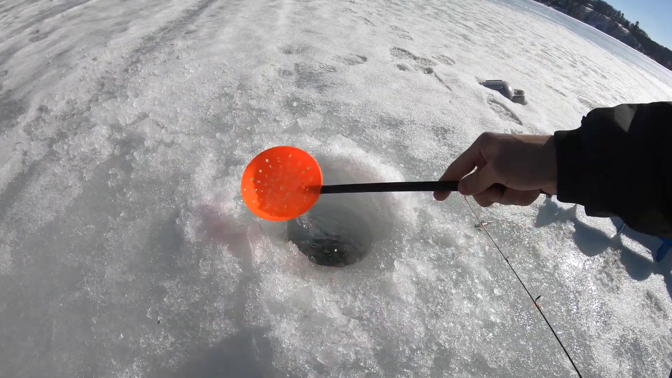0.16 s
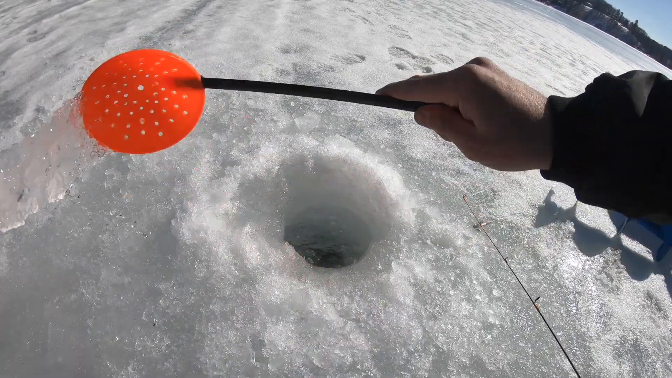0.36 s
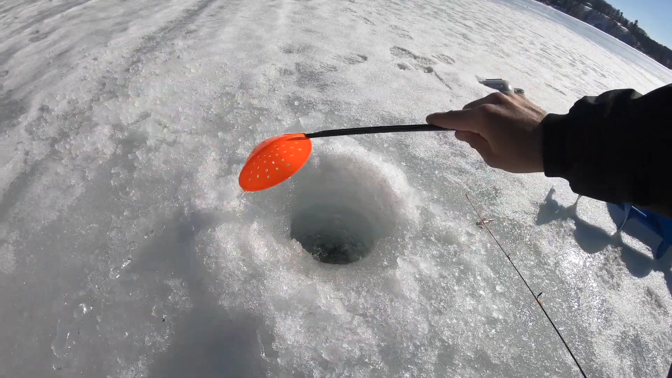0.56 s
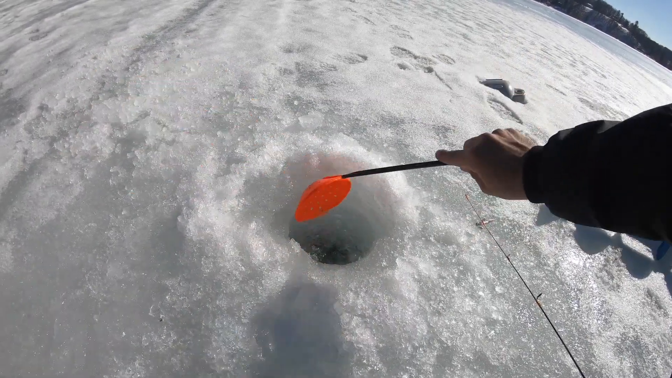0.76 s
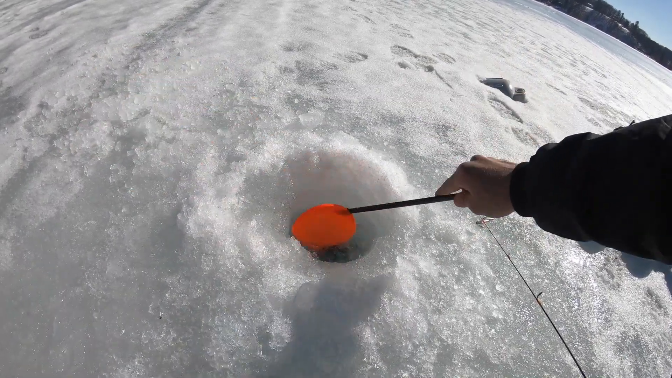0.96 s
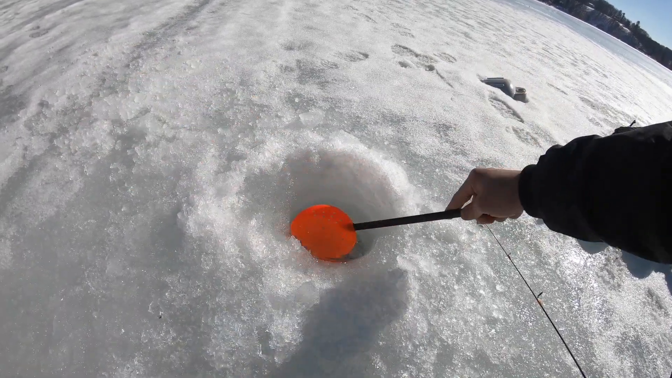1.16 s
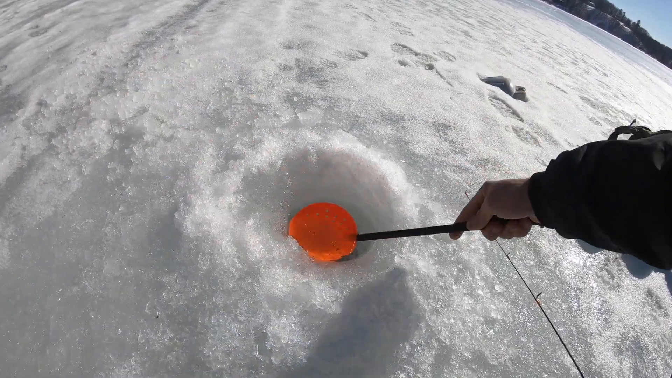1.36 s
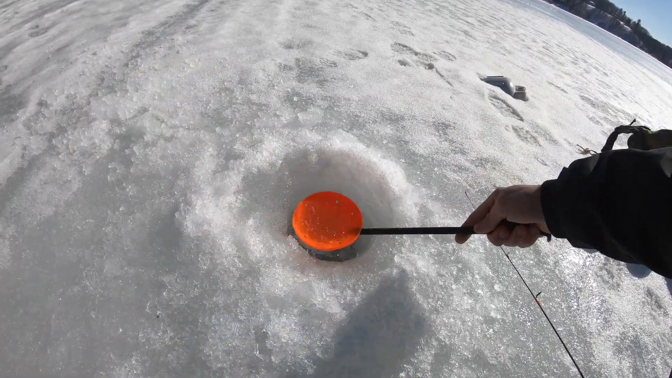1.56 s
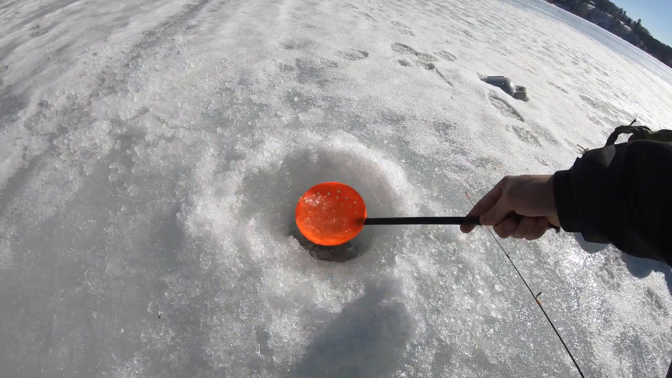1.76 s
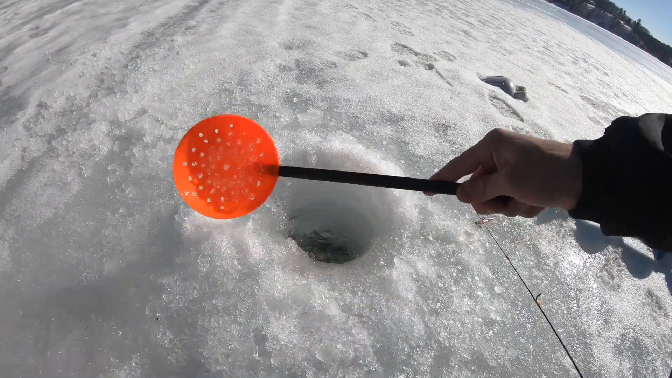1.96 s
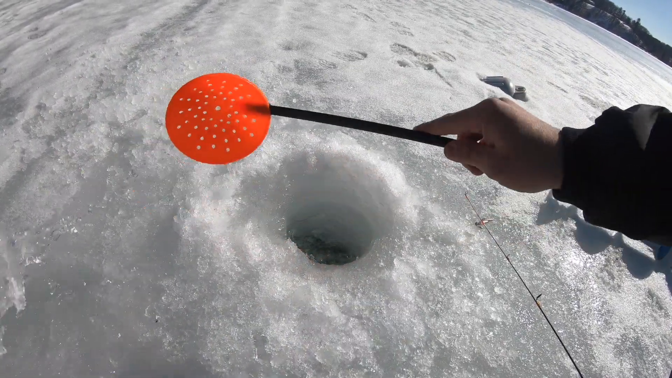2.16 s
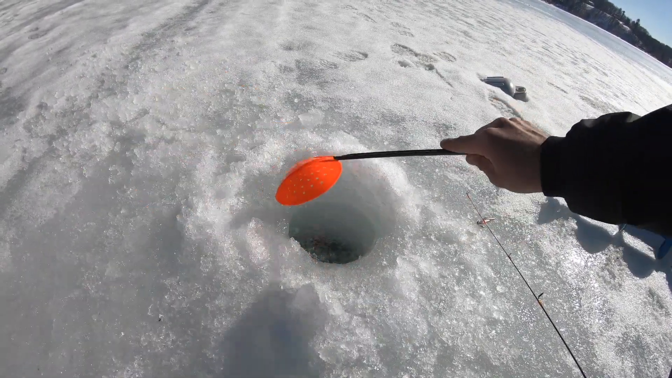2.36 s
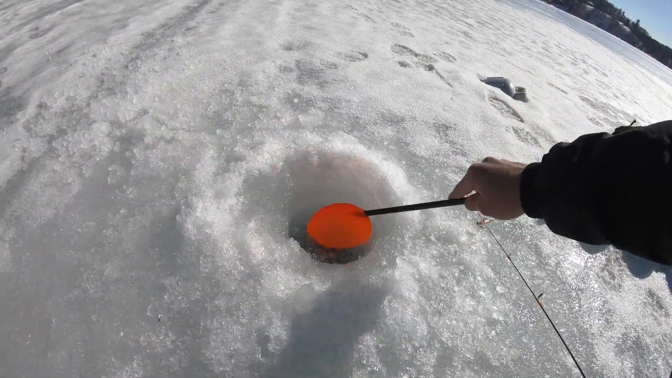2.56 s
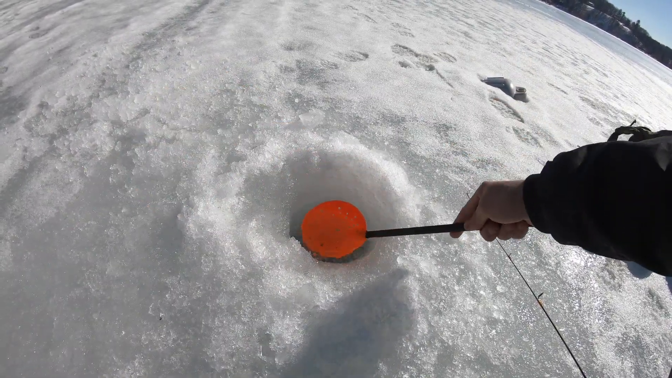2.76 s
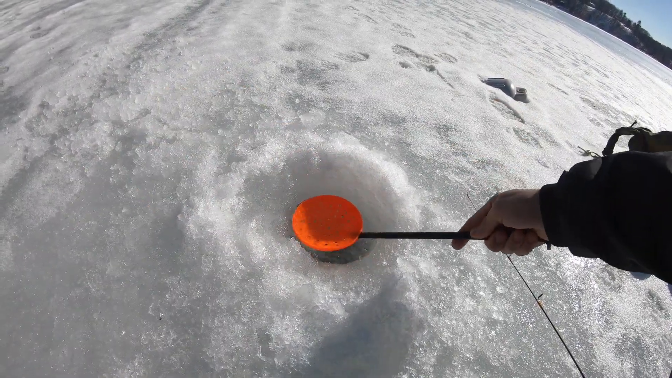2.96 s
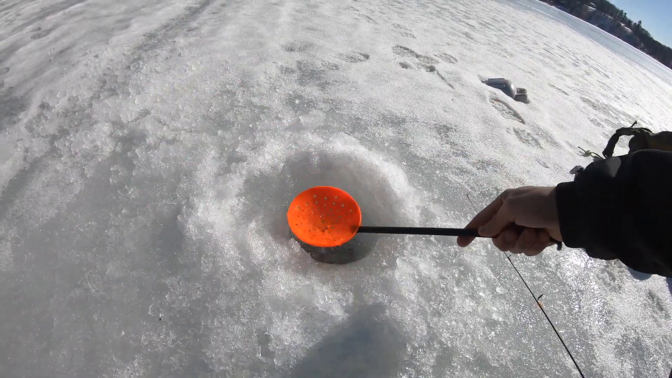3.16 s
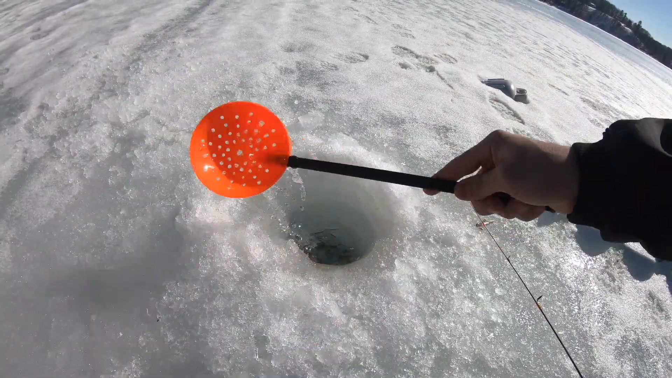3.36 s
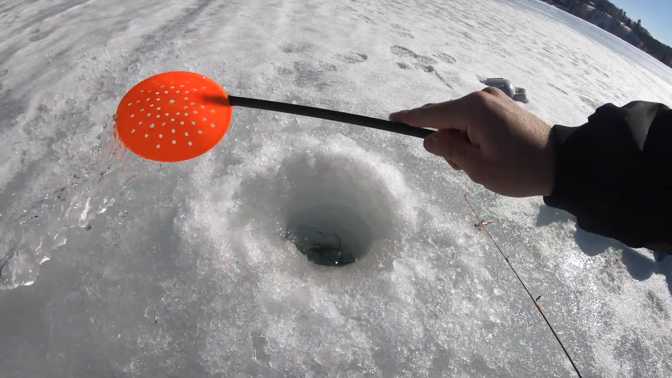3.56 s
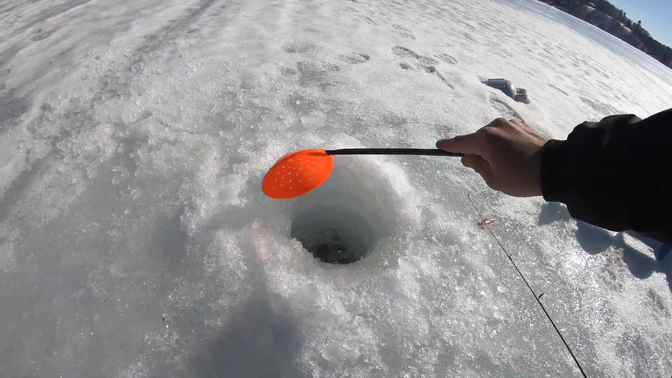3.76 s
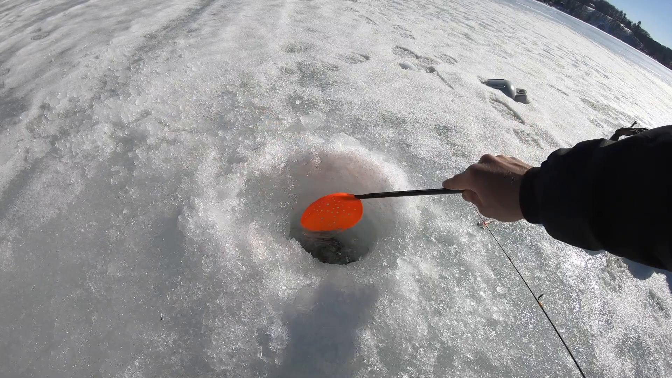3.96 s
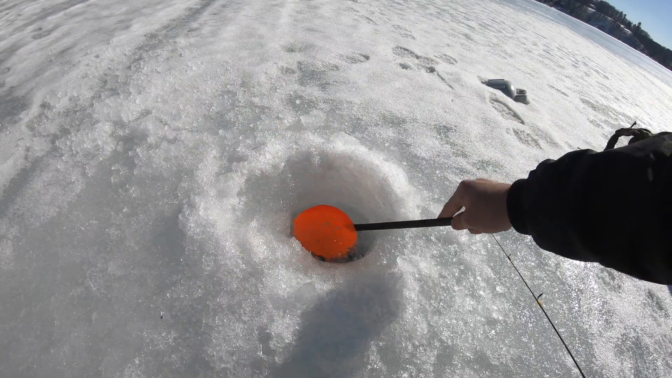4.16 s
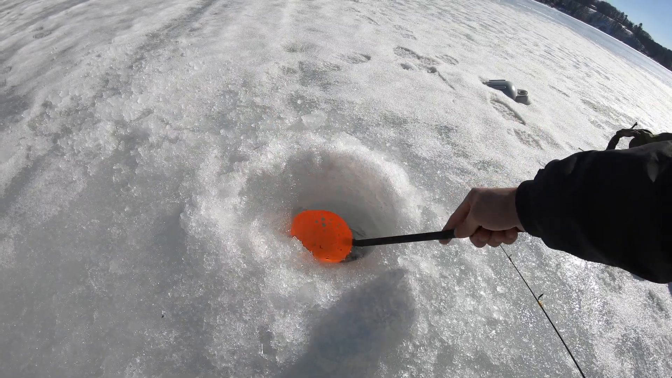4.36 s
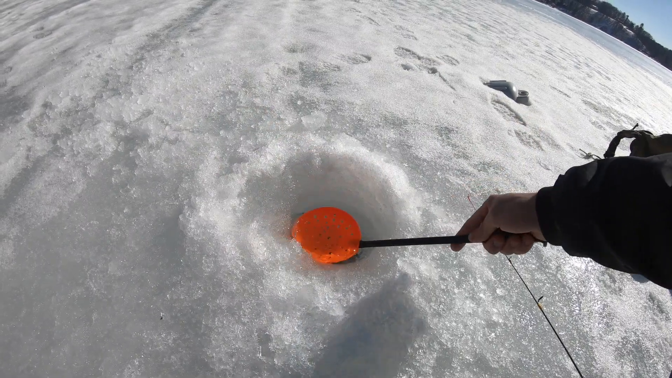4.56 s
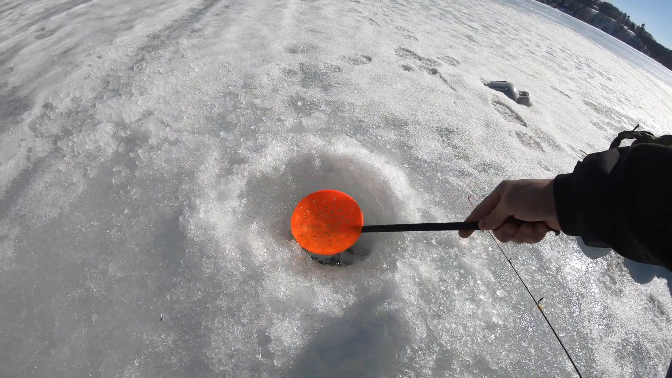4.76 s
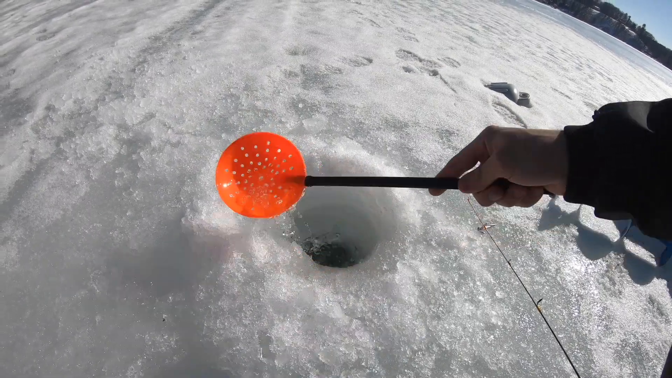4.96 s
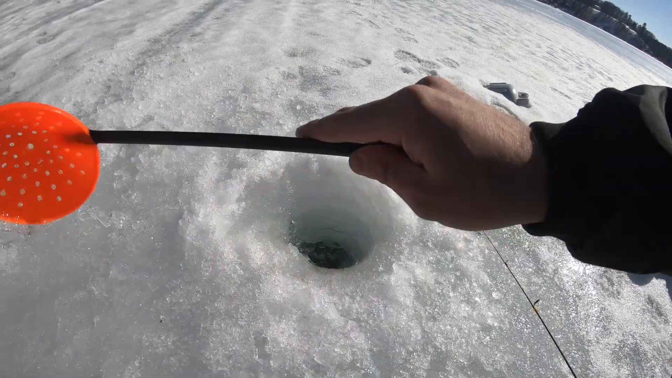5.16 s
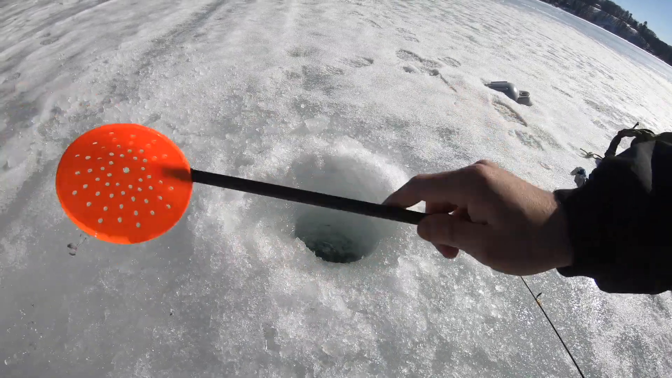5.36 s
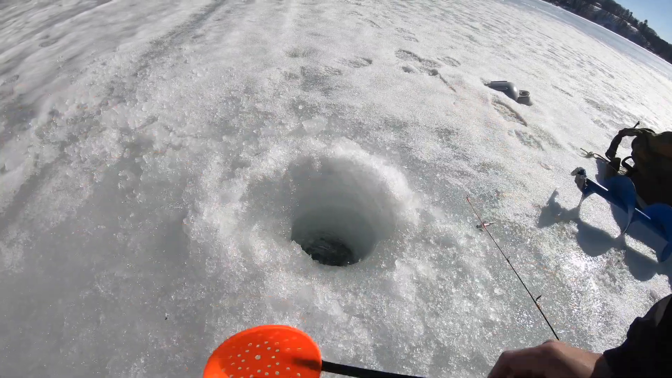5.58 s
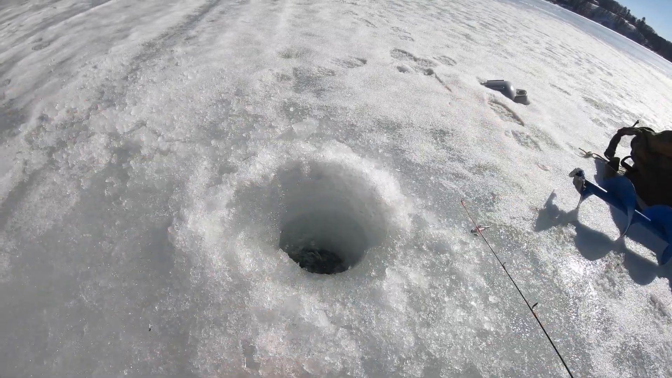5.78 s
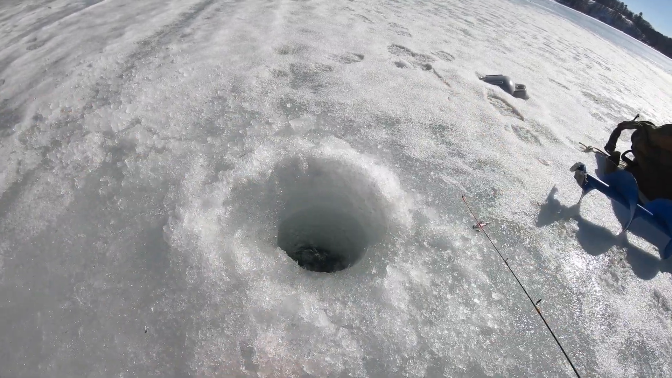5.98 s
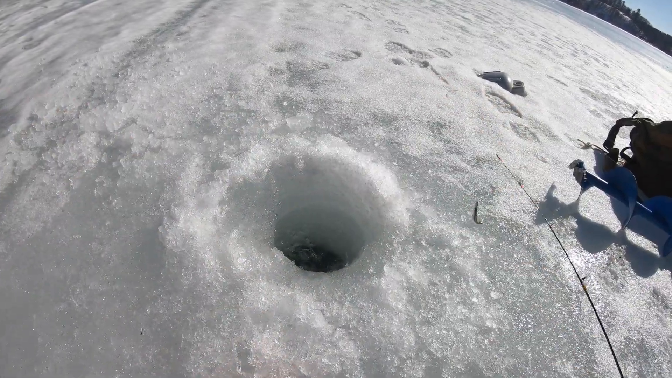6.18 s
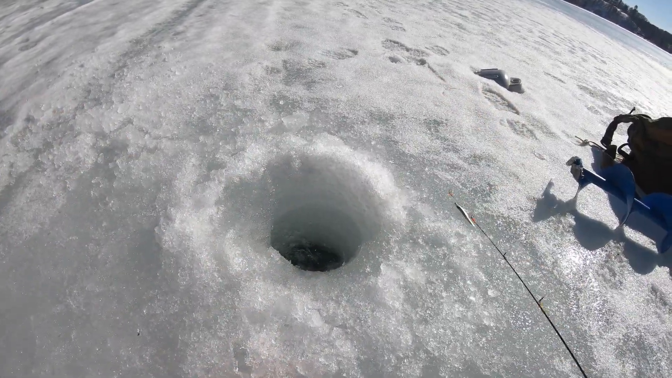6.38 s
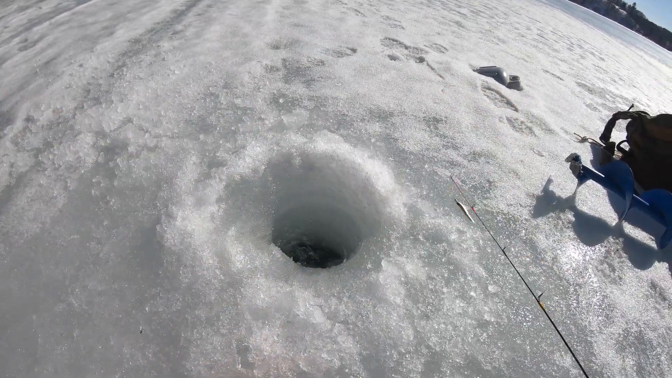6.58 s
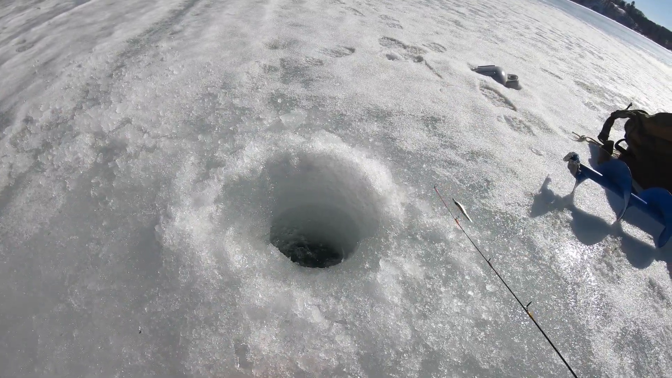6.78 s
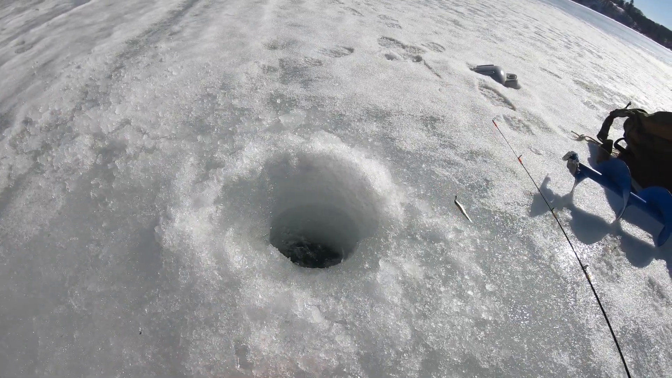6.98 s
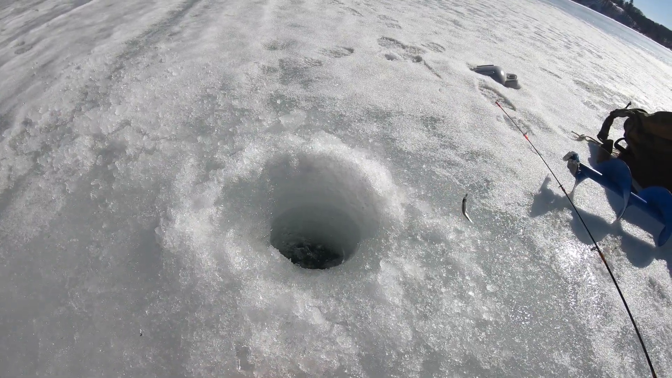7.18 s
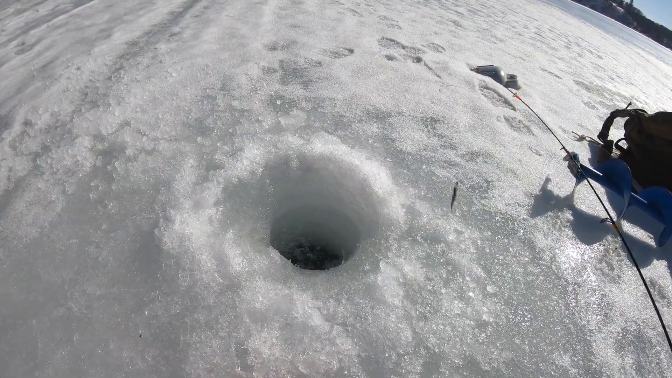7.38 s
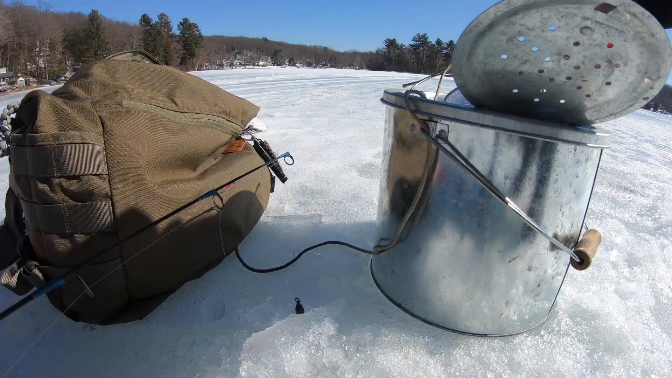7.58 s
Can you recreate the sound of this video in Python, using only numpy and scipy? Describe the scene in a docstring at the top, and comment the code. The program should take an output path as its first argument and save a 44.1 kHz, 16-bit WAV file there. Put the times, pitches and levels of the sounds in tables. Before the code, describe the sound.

A plastic ladle scoops slush from a hole in a frozen lake, close by, while wind rumbles and flutters on the microphone over a faint, distant rush of air. A wet slosh at 0.4 seconds and a fizzing splat at 0.7 come with a strong, wide gust; after one second the sound narrows to the centre. Light clicks on ice and small sloshes follow, with a very faint, thin squeak at 1.6. A knock and loud slosh at 2.1 lead to icy splatter and a cluster of clicks around 2.5. Slush drains and lands again at 3.8, followed by more taps. The busiest stretch, from 5 to 6 seconds, brings sloshes, crackling splats and a sharp knock near 5.9. Occasional tiny bubbles pop, and low wind puffs thump through the scooping. Then the draining thins to soft drips and ticks under the wind until about 7.5 seconds.

```python
"""Skimming slush from an ice hole

A plastic ladle scoops slush from a hole in lake ice. The slush hisses and crackles as it slides, drains
and is thrown; knocks on ice chips and the rim excite the ladle's damped modes; bubbles pop, and there is
one thin squeak. Turbulent wind buffets the microphone over a far rush of air. The stereo image is wide
in the first gust, then narrows to the centre."""
import sys
import numpy as np
from scipy import signal
from scipy.fft import rfft, irfft, next_fast_len
from scipy.io import wavfile
from scipy.ndimage import map_coordinates

SR = 44100
rng = np.random.default_rng(int(sys.argv[2]) if len(sys.argv) > 2 else 0)


def persist_wave(psi):
    """Save psi, clipped to +-1, as 16-bit WAV."""
    counts = np.round(np.clip(psi, -1, 1) * 32767).astype(np.int16)
    wavfile.write(sys.argv[1], SR, np.atleast_2d(counts).T)


N = 336471


def amp(db):
    return 10 ** (np.asarray(db) / 20)


def unit_rms(x):
    return x / np.sqrt(np.mean(x ** 2) + 1e-20)


def curves(rows):
    """Linear interpolation: one value per sample for each column after the time."""
    time_s, *columns = np.transpose(list(rows))
    return [np.interp(np.arange(N) / SR, time_s, column) for column in columns]


def wobble(rate_hz):
    """Random modulation: a spline through Gaussian values, rate_hz of them a second."""
    knots = rng.standard_normal(int(N * rate_hz / SR) + 4)
    return map_coordinates(knots, [np.arange(N) * rate_hz / SR])


def filtered(x, response):
    """Zero-phase filtering: the spectrum of x times a function of frequency."""
    size = next_fast_len(N + 8192)
    return irfft(rfft(x, size) * response(np.fft.rfftfreq(size, 1 / SR)), size)[..., :N]


def equalised(x, points):
    """Spectral shaping by (frequency_hz, gain_db) points joined on a log-frequency axis."""
    frequency_hz, gain_db = np.transpose(points)
    return filtered(x, lambda hz: amp(np.interp(np.log(hz + 1), np.log(frequency_hz), gain_db)))


def coloured(x, points):
    """Band-pass shaping: the spectrum falls away beyond the points; rms 1."""
    return unit_rms(equalised(x, [(1, -120), *points, (SR / 2, -120)]))


def grains(per_s, pitch_hz, spread, decay_cycles, size_db, rise=0):
    """Shot noise: tiny damped sines at random moments, a few much larger than the rest; rms 1."""
    when, rank = rng.random((int(per_s * N / SR), 2)).T[:, :, None]
    hz = np.clip(pitch_hz * np.exp(spread * rng.standard_normal(when.shape)), 600, SR / 4)
    k = np.arange(384)
    age = k * hz / (decay_cycles * SR)  # in time constants
    attack = np.minimum(4 * age, 1) if rise else 1
    shape = np.sin(2 * np.pi * hz * k / SR * (1 + rise * age)) * np.exp(-age) * attack
    size = amp(-size_db * np.log(rank + 0.039))
    at = (when * N).astype(int) + k
    return unit_rms(np.bincount(at.ravel(), (size * shape).ravel(), N + 384)[:N])


def bursts(rows, rise_s):
    """Exponential growth and decay of wet and icy power: 12 dB up in rise_s(fade_s), down in fade_s."""
    t, power = np.arange(N) / SR, np.zeros((2, N))
    for peak_s, wet_db, icy_db, fade_s in rows:
        span = slice(max(round((peak_s - .6) * SR), 0), round((peak_s + .8) * SR))
        age = t[span] - peak_s
        down_db = 12 * np.where(age < 0, -age / rise_s(fade_s), age / fade_s)
        power[:, span] += amp(2 * (np.array([[wet_db], [icy_db]]) - down_db))
    return power


def wind():
    """Turbulent pressure on a microphone port: a deep buffet, flutter in its cavity and single puffs."""
    # strength of the gusts: time_s, buffet_db, flutter_db
    gusts = [(0, -40, -50.5), (.3, -37, -47), (.45, -26.5, -42), (.82, -24, -40), (1.04, -46.5, -53.5),
             (1.6, -41, -40), (1.9, -45.5, -42.5), (2.5, -36, -40.5), (3.2, -46, -43.5), (3.58, -35, -38),
             (4.1, -37, -38.5), (4.65, -47.5, -44), (5.1, -31.5, -40), (5.78, -29.5, -31),
             (5.9, -43.5, -60), (6.42, -52.5, -46.5), (7.05, -37.5, -48.5), (7.56, -40, -47)]
    # buffet spectrum: frequency_hz, density_db
    buffet_spectrum = [(15, -15), (30, 0.5), (55, 0), (90, -5), (130, -13.5), (250, -39.5)]
    # cavity flutter spectrum: frequency_hz, density_db
    flutter_spectrum = [(70, -19.5), (110, -3), (160, 1.5), (230, -4), (330, -15), (500, -23), (900, -32.5),
                        (1500, -73.5)]
    buffet_db, flutter_db = curves(gusts)
    lumps_db = 2 * wobble(18)
    buffet = coloured(amp(lumps_db) * rng.standard_normal(N), buffet_spectrum)
    flutter = coloured(amp(lumps_db + 2.43 * wobble(40)) * rng.standard_normal(N), flutter_spectrum)
    return amp(buffet_db) * buffet + amp(flutter_db) * flutter + puffs(flutter)


def far_air(level_db=-57.5):
    """Broadband noise with slow amplitude modulation: the smooth rush of air over the lake."""
    # spectrum of the rush: frequency_hz, density_db
    spectrum = [(250, -7), (600, -14.5), (1000, -23), (1400, -23), (3500, -36), (4200, -42.5),
                (7500, -48.5), (11500, -66)]
    return amp(level_db + 2.3 * wobble(2.825)) * coloured(rng.standard_normal(N), spectrum)


def slush():
    """Incoherent sources add in power: draining, sliding and landing slush drive a hiss and a fizz.
    Returns two uncorrelated signals under the same swells."""
    # steady draining of the ladle: time_s, wet_db, icy_db
    drain = [(0, -85, -84), (.15, -58, -66), (.35, -54, -52), (.58, -64, -55), (.93, -48, -56),
             (1.05, -64, -72), (1.88, -70, -74), (2.27, -57, -48), (2.55, -48, -54), (2.9, -51, -65),
             (3.2, -52, -63), (3.5, -45, -56), (3.72, -54, -50), (4.25, -59, -74), (4.8, -54, -67),
             (5.1, -44, -56), (5.36, -50, -46), (5.58, -39, -42), (5.7, -46, -52), (5.9, -52, -68),
             (6.05, -56, -74), (6.6, -63, -75), (7.1, -63, -72), (7.56, -77, -89)]
    # slides that swell and fade: peak_s, wet_db, icy_db, fade_s
    sloshes = [(.2, -51.5, -57, .05), (.43, -25.5, -37, .04), (.87, -40, -50, .05), (1.21, -45.5, -85, .06),
               (1.295, -48, -68, .03), (1.36, -43, -67, .02), (1.41, -36.5, -66, .025),
               (1.49, -52, -74, .03), (2.145, -23.5, -41, .033), (2.405, -28, -26.5, .045),
               (2.6, -40, -46, .05), (2.7, -46, -70, .02), (2.78, -38, -66, .05), (3.265, -42, -55, .04),
               (3.385, -45, -52, .02), (3.535, -38, -46, .04), (3.64, -40, -45, .07), (4.04, -46, -56, .05),
               (4.11, -44, -58, .03), (4.99, -42, -59, .04), (5.24, -28.5, -42, .055),
               (5.81, -31, -43, .055), (6.11, -48, -53, .045), (6.24, -52, -59, .025),
               (6.34, -55, -58, .025), (6.445, -56, -66, .025), (6.535, -55, -62, .015),
               (6.695, -46, -58.5, .035), (7.075, -57, -61, .025)]
    # sudden landings: peak_s, wet_db, icy_db, fade_s
    splats = [(.672, -27.5, -24, .048), (1.93, -41, -50, .11), (2.36, -35.5, -37, .05),
              (3.797, -28, -27, .055), (5.41, -43, -34, .035), (5.485, -31, -29, .06),
              (5.738, -31.5, -48, .05), (5.922, -37.5, -49, .06)]
    # spectrum of the wet hiss: frequency_hz, gain_db
    wet_spectrum = [(500, -34.5), (900, -13.5), (1250, -5), (1600, -5), (2500, -5.5), (3500, -1.5),
                    (4600, -11), (7000, -16.5), (12000, -52.5)]
    # spectrum of the ice-crystal fizz: frequency_hz, gain_db
    icy_spectrum = [(3000, -27), (4300, -0.5), (5500, -3.5), (6500, -4), (7600, -4), (9000, -11),
                    (10300, -11), (11500, -22.5), (15700, -30.5)]
    power = amp(2 * np.array(curves(drain)))
    power += bursts(sloshes, rise_s=lambda fade_s: .8 * fade_s)
    power += bursts(splats, rise_s=lambda fade_s: .004)
    stutter = amp(1.5 * wobble(45) + 2.18 * wobble(150))
    crackle = grains(per_s=600, pitch_hz=2590, spread=.42, decay_cycles=2.3, size_db=3.5)
    droplets = grains(per_s=90, pitch_hz=3000, spread=.35, decay_cycles=5, size_db=5, rise=.02)
    wet = 1.02 * rng.standard_normal(N) + 0.45 * crackle + 0.38 * droplets
    icy = 1.07 * rng.standard_normal(N)
    icy += 0.34 * grains(per_s=400, pitch_hz=6850, spread=.3, decay_cycles=5, size_db=8.5)
    hiss = coloured(stutter * wet, wet_spectrum)
    fizz = coloured(stutter * amp(2.5 * wobble(30)) * icy, icy_spectrum)
    texture = np.array([hiss, fizz])
    uncorrelated = np.roll(texture, N // 2, axis=1)
    return [np.sum(np.sqrt(power) * layers, 0) for layers in (texture, uncorrelated)]


def bubbles(attack_s=0.0026):
    """Bubble resonance: each damped tone rises in pitch as the bubble reaches the surface."""
    # air bubbles: start_s, pitch_hz, level_db, t60_s
    pops = [(.14, 1000, -37.5, 0.038), (.308, 1996, -21.5, 0.026), (2.572, 760, -23.5, 0.026),
            (2.7, 860, -30, 0.046), (3.1, 542, -34.5, 0.053), (5.045, 2230, -20, 0.046),
            (5.216, 800, -24, 0.025)]
    out, t = np.zeros(N + SR), np.arange(SR // 8) / SR
    attack = 1 - np.exp(-t / attack_s)
    for start_s, pitch_hz, level_db, t60_s in pops:
        phase = 2 * np.pi * np.cumsum(pitch_hz * (1 + 0.305 * t / t60_s)) / SR
        out[round(start_s * SR):][:len(t)] += amp(level_db - 60 * t / t60_s) * np.sin(phase) * attack
    return out[:N]


def knocks(chip_t60_s=0.014, snap_t60_s=0.012, attack_s=0.00039, second_click_db=-9):
    """Impact excites damped modes: ladle and chip ring, and ice snaps.
    A weaker click a few milliseconds later roughens the attack."""
    # ladle striking ice: start_s, level_db, chip_hz, bowl_db, snap_db
    impacts = [(0.3072, -29.5, 2070, -20, 3), (0.3975, -19.5, 2680, -20, -18),
               (0.613, -29.5, 3600, -16, -3), (0.7981, -18, 2730, -28, -9.5),
               (0.8917, -22.5, 3370, -20, -12), (1.1855, -32.5, 3530, -19, -34),
               (1.3539, -24, 2570, -10, -28), (1.3954, -20, 2430, -13, -22),
               (1.4809, -28.5, 3030, -15, -17), (1.8965, -33, 4040, -28, -21),
               (2.0592, -24, 2030, -10, -18), (2.1397, -12.5, 1800, 6, -30), (2.169, -18, 2720, -28, -5),
               (2.5263, -19, 2670, -12, -5), (2.5384, -16.5, 3300, -10, -20), (2.556, -14, 2390, -7, -28),
               (2.586, -23, 2020, -3, -6), (2.8689, -25.5, 2800, -13, -14), (3.409, -24, 3200, -30, -30),
               (3.9873, -15, 2030, -3, -14), (4.0257, -31, 3200, -20, -10), (4.0984, -27, 2000, -3, -18),
               (4.138, -29, 2600, -4, -24), (4.174, -31.5, 3770, -16, -26), (4.301, -36, 3600, -20, -20),
               (4.6, -36, 2200, -12, -30), (4.627, -37, 2500, -9, -30), (4.8604, -20, 3700, -21, -30),
               (5.0968, -19, 3720, -25, -22), (5.268, -24, 3000, -20, -8), (5.2975, -23.5, 2480, -8, -12),
               (5.4066, -23, 3540, -23, 2), (5.43, -27, 3300, -28, -10), (5.7396, -15, 3690, -18, -13),
               (5.8806, -10, 2910, -5, -15), (5.916, -29, 2900, -14, -25), (5.956, -22.5, 1880, 2, -22),
               (6.0926, -30.5, 3500, -10, -6), (6.1669, -27, 1760, 4, -22), (6.348, -33, 3200, -17, -1),
               (6.836, -48, 4800, -25, 4), (6.9471, -50, 3110, -14, 5)]
    # modes of the ladle, the bowl's first: pitch_hz, level_db, t60_s
    ladle_modes = [(1332, -1.5, 0.026), (2170, -9, 0.013), (2810, -4.5, 0.0086), (4350, -5, .007)]
    out, t = np.zeros(N + SR), np.arange(SR // 16) / SR
    scatters_db = rng.normal(0, 2.1, (len(impacts), len(ladle_modes)))  # also detunes the modes
    snap_band = signal.butter(3, [5200, 9800], "band", fs=SR, output="sos")
    attack = 1 - np.exp(-t / attack_s)
    for (start_s, level_db, chip_hz, bowl_db, snap_db), scatter_db in zip(impacts, scatters_db):
        bowl, *upper = [amp(db + shift - 60 * t / t60_s) * np.sin(2 * np.pi * hz * amp(shift / 8) * t)
                        for (hz, db, t60_s), shift in zip(ladle_modes, scatter_db)]
        chip = amp(-0.5 - 60 * t / chip_t60_s) * np.sin(2 * np.pi * chip_hz * t)
        snap_noise = signal.sosfilt(snap_band, rng.standard_normal(len(t)))
        snap = amp(snap_db - 60 * t / snap_t60_s) * snap_noise
        ring = (amp(bowl_db) * bowl + sum(upper) + chip) * attack
        second_click_s = start_s + .003 + .002 * abs(scatter_db[0])
        out[round(start_s * SR):][:len(t)] += amp(level_db) * (ring + snap)
        out[round(second_click_s * SR):][:len(t)] += amp(level_db + second_click_db) * (chip + snap)
    return out[:N]


def puffs(flutter):
    """Pressure pulses in the port: low tone bursts a few cycles long, roughened by the flutter."""
    # single puffs of wind: start_s, level_db, pitch_hz
    pulses = [(0.419, -21.5, 89), (0.551, -23, 98), (0.594, -17.5, 91.5), (0.673, -19.5, 128),
              (0.778, -16.5, 174), (0.819, -20.5, 122), (0.926, -20.5, 152), (2.197, -13, 145),
              (2.485, -23, 200), (3.467, -25, 179), (3.564, -12.5, 151), (3.889, -18.5, 164),
              (3.93, -21, 158), (4.063, -16, 159.6), (4.775, -17.5, 186), (5.072, -22.5, 168),
              (5.168, -15, 158.4), (5.269, -21, 132.5), (5.6, -29.5, 97), (5.676, -14.5, 169),
              (5.795, -17.5, 148)]
    out, t = np.zeros(N + SR), np.arange(SR // 8) / SR
    swell = (t / 0.0114) ** 2 * np.exp(2 - 2 * t / 0.0098)
    for (start_s, level_db, pitch_hz), phases in zip(pulses, rng.random((len(pulses), 2))):
        start = round(start_s * SR)
        tone = np.sin(2 * np.pi * (phases[0] + pitch_hz * t))
        overtone = 0.16 * np.sin(2 * np.pi * (phases[1] + 2.075 * pitch_hz * t))
        roughness = 0.38 * flutter[start:][:len(t)]
        out[start:][:len(t)] += amp(level_db) * swell * (tone + overtone + roughness)
    return out[:N]


def squeak(fade_s=.02):
    """Frequency modulation: one thin, unsteady tone arches up and down."""
    # course of the squeak: time_s, pitch_hz, level_db
    arch = [(1.56, 1306, -60), (1.61, 1604, -51), (1.68, 1230, -60)]
    (start_s, start_hz, _), *_, (end_s, end_hz, _) = arch
    pitch_hz, level_db = curves([(start_s - fade_s, start_hz, -120), *arch,
                                 (end_s + fade_s, end_hz, -120)])
    phase = 2 * np.pi * np.cumsum(pitch_hz * (1 + 0.028 * wobble(240))) / SR
    return amp(level_db + 3.3 * wobble(100)) * np.sin(phase)


def scene():
    """Mid-side stereo: uncorrelated sound at the two ports gives width, which shrinks with the side."""
    # side spectrum of the slush, whose treble differs more between ports: frequency_hz, gain_db
    spread = [(1000, -6), (2500, -9), (8000, 0), (14000, 2)]
    # side gains: time_s, wind_db, near_db
    width = [(.97, 0, 0), (1.05, -5, -16), (1.82, -20, -28), (1.89, -60, -26)]
    wind_db, near_db = curves(width)
    slush_mid, slush_side = slush()
    near = slush_mid + knocks() + bubbles() + squeak()
    near_side = equalised(slush_side, spread) + .15 * near  # near sources sit a little left
    mid = wind() + far_air() + near
    side = amp(wind_db) * (wind() + far_air()) + amp(near_db) * near_side
    return np.array([mid + side, mid - side])


def record(dry):
    """Gating and band limiting: the sound stops just before the end, and the top treble is cut."""
    stop_s, cutoff_hz = 7.562, 15725
    gate_db, = curves([(0, 0), (stop_s, 0), (stop_s + 0.0045, -22), (stop_s + 0.018, -40)])
    return filtered(dry * amp(gate_db), lambda hz: hz < cutoff_hz)


dry = scene()
out = record(dry)
persist_wave(out)
```